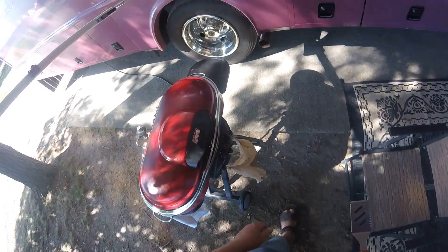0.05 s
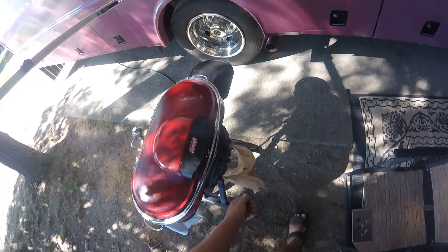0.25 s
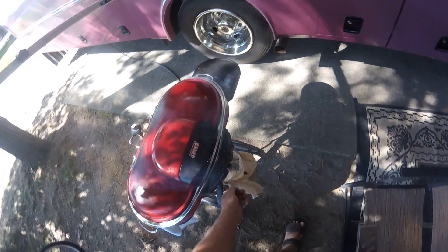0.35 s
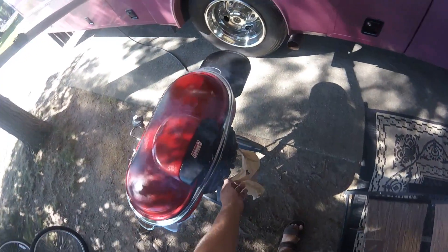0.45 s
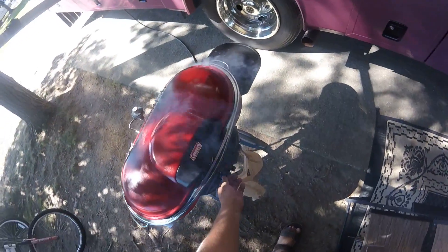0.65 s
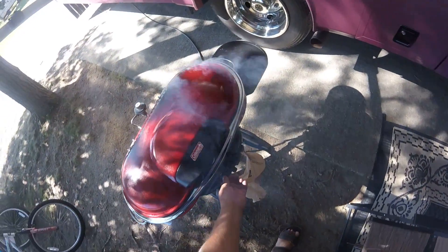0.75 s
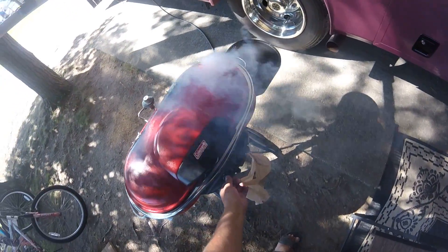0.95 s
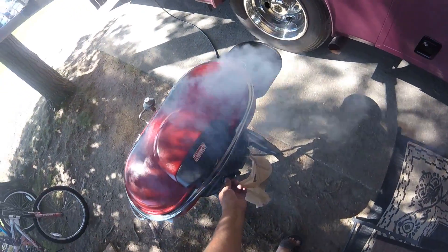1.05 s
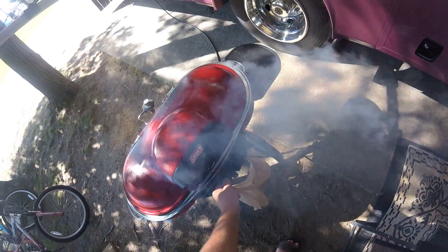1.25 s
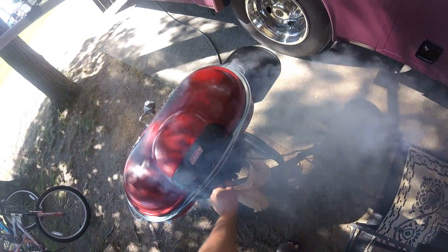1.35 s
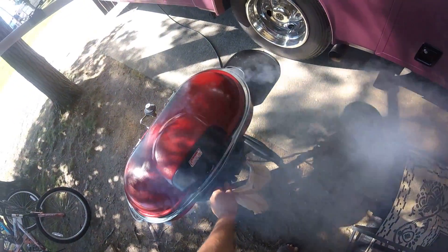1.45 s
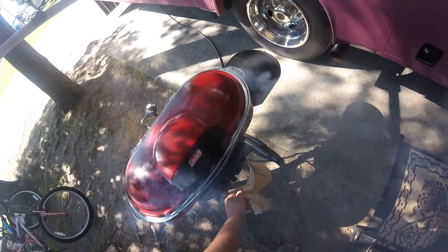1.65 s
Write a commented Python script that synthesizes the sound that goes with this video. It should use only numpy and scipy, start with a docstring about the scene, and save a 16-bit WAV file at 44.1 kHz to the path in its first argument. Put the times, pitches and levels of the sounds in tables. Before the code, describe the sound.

A gas grill clicks and lights with a low whump, then hisses steadily.

```python
"""A gas grill is lit outdoors, close up. Light wind rumbles on the microphone over a faint hum.
At 0.17 s the igniter clicks twice, a scrape with a steel ring. At 0.2 s the gas catches with a low
whump and the metal lid knocks and rattles on its rim. The burner then settles to a soft roar under
a steady hiss, spitting once at 0.9 s. Near 1.4 s the wind swells in a brief flutter."""
import sys
import numpy as np
from scipy.fft import rfft, irfft, next_fast_len
from scipy.io import wavfile
from scipy.ndimage import map_coordinates

SR = 44100
rng = np.random.default_rng(int(sys.argv[2]) if len(sys.argv) > 2 else 0)


def dump(signal):
    """Clip the signal to [-1, 1] and save it as 16-bit WAV at the path in sys.argv[1]."""
    limited = np.clip(np.atleast_2d(signal).T, -1, 1)
    pcm = np.round(limited * 32767).astype(np.int16)
    wavfile.write(sys.argv[1], SR, pcm)


N = 74970
TIME_S = np.arange(N) / SR


def amp(db):
    """Decibels to gain."""
    return 10 ** (np.asarray(db) / 20)


def curve(rows):
    """One value per sample from (time_s, value) rows."""
    return np.interp(TIME_S, *np.transpose(rows))


def since(start_s):
    """Seconds since start_s, zero before it."""
    return np.maximum(TIME_S - start_s, 0)


def strike(start_s, rise_s, t60_s):
    """Exponential rise and decay."""
    age_s = since(start_s)
    return (1 - np.exp(-age_s / rise_s)) * amp(-60 * age_s / t60_s)


def swell(centre_s, width_s):
    """Gaussian rise and fall."""
    return np.exp(-((TIME_S - centre_s) / width_s) ** 2)


def wobble(rate_hz):
    """Smooth curve through random knots."""
    knots = rng.standard_normal(int(N * rate_hz / SR) + 4)
    return map_coordinates(knots, [TIME_S * rate_hz])


def walk(start_s, rate_hz):
    """Random walk of 80 steps from zero."""
    path = np.append(0, np.cumsum(rng.standard_normal(80)))
    return np.interp(since(start_s) * rate_hz, np.arange(len(path)), path)


def filtered(x, response):
    """Apply a gain given as a function of frequency."""
    size = next_fast_len(N + SR // 2)
    return irfft(rfft(x, size) * response(np.fft.rfftfreq(size, 1 / SR)), size)[:N]


def noise(spectrum, tilt_db_per_oct=0):
    """Noise of rms 1, shaped by (freq_hz, gain_db) rows and a tilt."""
    freq_hz, gain_db = np.transpose(spectrum)

    def response(hz):
        shape_db = np.interp(np.log(hz + 1), np.log(freq_hz + 1), gain_db)
        return amp(shape_db + tilt_db_per_oct * np.log2(hz + 1))

    white = rng.standard_normal(next_fast_len(N + SR // 2))
    coloured = filtered(white, response)
    return coloured / np.sqrt(np.mean(coloured ** 2) + 1e-20)


def ring(modes, start_s, rise_s, scatter_db, rough_rad, steps_per_cycle, tilt_db_per_oct=0):
    """Struck modes with wandering phase; the tilt pivots on the third mode."""
    out = 0
    for pitch_hz, level_db, t60_s in modes:
        tilt_db = tilt_db_per_oct * np.log2(pitch_hz / modes[2][0])
        gain = amp(level_db + scatter_db * rng.standard_normal() + tilt_db)
        phase = 2 * np.pi * (pitch_hz * since(start_s) + rng.random())
        phase += rough_rad * walk(start_s, steps_per_cycle * pitch_hz)
        out += gain * strike(start_s, rise_s, t60_s) * np.sin(phase)
    return out


# pitch_hz, rms_db
HUM_TONES = [(120, -55), (165, -53.5)]

def hum():
    """Two faint tones, wavering in level and phase."""
    out = 0
    for pitch_hz, rms_db in HUM_TONES:
        envelope = np.sqrt(2) * amp(rms_db + 2.5 * wobble(rate_hz=4.94))
        out += envelope * np.sin(2 * np.pi * pitch_hz * TIME_S + 0.5 * wobble(rate_hz=5.98))
    return out


# time_s, level_db
WIND_ENVELOPE = [(0, -48.5), (.05, -46), (.15, -35), (.45, -32.5), (.68, -32.5), (.78, -38.5), (.92, -31.5),
                 (1.05, -34), (1.2, -34), (1.37, -32.5), (1.5, -37), (1.57, -32), (1.7, -35)]
# freq_hz, gain_db
WIND_SPECTRUM = [(8, -14), (18, 3), (29, -5.5), (45, -7.5), (65, -14), (130, -21), (200, -29.5), (500, -62),
                 (2000, -120)]
GUST_SPECTRUM = [(40, -6), (75, 8), (130, -8), (200, -19), (400, -37), (1500, -120)]

def wind():
    """Wind rumbles on the microphone, with one fluttering gust."""
    rumble = noise(WIND_SPECTRUM) * amp(curve(WIND_ENVELOPE) + 0.6 * wobble(rate_hz=11.7))
    gust = noise(GUST_SPECTRUM) * amp(-36) * swell(centre_s=1.39, width_s=0.07)
    return rumble + gust


# time_s, level_db
ROAR_ENVELOPE = [(0, -50.5), (.15, -47.5), (.3, -39.5), (.66, -44.5), (.95, -43.5), (1.4, -44),
                 (1.7, -45.5)]
# freq_hz, gain_db
ROAR_SPECTRUM = [(40, -34), (90, -14.5), (170, 3.5), (205, -6.5), (245, 3.5), (310, 3.5), (380, -4.5),
                 (450, 0), (580, -2.5), (700, 1), (830, 1.5), (950, -7), (1250, -11), (1550, -22),
                 (2500, -47), (8000, -120)]

def flame_roar():
    """The flame flutters with a soft roar."""
    return noise(ROAR_SPECTRUM) * amp(curve(ROAR_ENVELOPE) + 0.7 * wobble(rate_hz=25.84))


# time_s, level_db
FLOW_ENVELOPE = [(0, -55.5), (.12, -53), (.25, -49.8), (.36, -48.5), (.42, -47.5), (.62, -47.4), (.78, -47),
                 (.9, -47.5), (1.02, -48), (1.25, -47.8), (1.5, -48), (1.7, -47.5)]
# freq_hz, gain_db
HISS_SPECTRUM = [(900, -28), (1600, -13), (2000, -10), (2400, -9), (2950, -4.5), (3500, -5.5),
                 (4000, -10.5), (4600, -3), (5400, 1), (5850, -2), (6550, 0), (7100, -4), (7700, -8),
                 (8800, -9.5), (9700, -8), (11000, -13), (12500, -14), (13500, -20.5), (15000, -34)]
FIZZ_SPECTRUM = [(3000, -120), (6000, -25), (8500, -3), (10000, 0), (12500, -3), (15000, -7)]
SPIT_SPECTRUM = [(2000, -30), (3200, -1.5), (5000, -14), (7800, -5), (8600, -1), (9400, -12), (11500, -11),
                 (15000, -16)]

def burner_hiss():
    """The burner hisses, brighter as the flow grows, and spits once."""
    flow_db = curve(FLOW_ENVELOPE)
    hiss = noise(HISS_SPECTRUM) * amp(flow_db + 0.44)
    hiss *= amp(0.45 * wobble(rate_hz=30) + 0.32 * wobble(rate_hz=400))
    fizz_db = -64 + 2 * (flow_db - flow_db.max())  # airy top: 2 dB per dB of hiss
    fizz = noise(FIZZ_SPECTRUM) * amp(fizz_db + 2.2 * wobble(rate_hz=12))
    spit = noise(SPIT_SPECTRUM) * amp(-47.5) * swell(centre_s=0.888, width_s=0.014)
    return hiss + fizz + spit


# start_s, level_db, t60_s, tilt_db_per_oct
IGNITER_CONTACTS = [(0.1736, -34.5, 0.09, -1), (0.1985, -31, 0.014, -4), (0.2006, -31.5, 0.025, -1),
                    (0.2043, -36, 0.13, -2.5), (0.2106, -36.5, 0.045, 0)]
# freq_hz, gain_db
SCRAPE_SPECTRUM = [(900, 2.5), (1800, -4), (2400, 7.5), (3400, -2.5), (4100, -7.5), (5100, 7), (6800, -0.5),
                   (7800, -4), (9000, -2), (10200, -2.5), (12000, -14), (15500, -17)]
# pitch_hz, level_db, t60_s
STEEL_MODES = [(2335, -15, 0.15), (2700, -10.5, 0.1), (5070, -6, 0.017), (3550, -9, 0.079),
               (5400, -22, 0.035), (6650, -8.5, 0.13), (10120, -5, 0.021)]
HAMMER_MODES = [(5100, 0, .0075), (6600, -11, .006), (10300, -4, .005), (11500, -9, .005)]

def igniter():
    """Contacts scrape and ring the steel: one click, then a tight cluster as the hammer snaps."""
    clicks = 0
    for start_s, level_db, t60_s, tilt_db_per_oct in IGNITER_CONTACTS:
        scrape = noise(SCRAPE_SPECTRUM, tilt_db_per_oct) * strike(start_s, rise_s=0.0006, t60_s=t60_s)
        steel = ring(STEEL_MODES, start_s, rise_s=0.00028,
                     scatter_db=1, rough_rad=0.74, steps_per_cycle=0.22)
        clicks += amp(level_db) * (scrape + amp(-4.5) * steel)
    snap = ring(HAMMER_MODES, start_s=0.2007, rise_s=0.0008,
                scatter_db=0, rough_rad=0.3, steps_per_cycle=0.31)
    return clicks + amp(-19.5) * snap


# start_s, level_db, tilt_db_per_oct
LID_KNOCKS = [(.177, -34.5, 5), (0.2016, -23.5, 0), (0.2097, -26.5, 3), (0.2182, -19, -2),
              (0.2366, -28, 0.5), (0.255, -36, 5.5), (0.2844, -29, 4.5), (0.2946, -28.5, 2),
              (0.3221, -30.5, -3.5), (0.361, -37.5, -.5), (.391, -31.5, 2), (.473, -36, -4.5),
              (0.528, -37.5, -3)]
# pitch_hz, level_db, t60_s
LID_MODES = [(126, 2, .15), (231, -9.5, .1), (296, -6, .16), (340, -12, .1), (428, -14, .1),
             (622, -14, .11), (715, -13.5, .08), (788, -11.5, .09), (868, -14, .11), (1050, -21, .08),
             (1220, -26, .08)]
# freq_hz, gain_db
THUD_SPECTRUM = [(40, -16), (100, 8), (150, 3), (205, -5), (310, -1), (480, -20.5), (760, -9), (1000, -19),
                 (1400, -29.5), (2000, -37), (6000, -120)]

def lid():
    """The lid jumps and rattles on its rim: each contact is a hollow ring and a dull thud."""
    out = 0
    for start_s, level_db, tilt_db_per_oct in LID_KNOCKS:
        hollow = ring(LID_MODES, start_s, rise_s=0.001, scatter_db=2.5,
                      rough_rad=0.85, steps_per_cycle=0.231, tilt_db_per_oct=tilt_db_per_oct)
        thud = noise(THUD_SPECTRUM, tilt_db_per_oct) * strike(start_s, rise_s=0.001, t60_s=0.047)
        out += amp(level_db) * (hollow + amp(-2.5) * thud)
    return out


# freq_hz, gain_db
FLARE_SPECTRUM = [(40, -5), (90, 8.5), (150, 4.5), (200, -1), (310, -7.5), (390, -7.5), (600, -15),
                  (850, -13.5), (1000, -22.5), (1350, -17), (1700, -44), (2300, -23.5), (4000, -48),
                  (8000, -120)]
# centre_s, level_db, half_width_s
LOW_PUFFS = [(0.366, -19.5, 0.0021), (0.4753, -19, 0.0018)]

def ignition():
    """The gas catches: the air under the lid throbs, a flare dies away and two puffs follow."""
    start_s, rise_s, throb_hz = 0.2027, 0.0049, 29.8
    throb = -np.sin(2 * np.pi * throb_hz * since(start_s)) * strike(start_s, rise_s, t60_s=0.6)
    flare = noise(FLARE_SPECTRUM) * strike(start_s, rise_s, t60_s=0.57)
    out = amp(-13.5) * throb + amp(-25) * flare
    for centre_s, level_db, half_width_s in LOW_PUFFS:
        offset = (TIME_S - centre_s) / half_width_s
        pulse = -offset * np.exp((1 - offset ** 2) / 2)  # one push and pull, peak 1
        tail = noise(FLARE_SPECTRUM) * strike(centre_s - half_width_s, half_width_s, t60_s=0.22)
        out += amp(level_db) * (pulse + amp(-15) * tail)
    return out


def scene():
    """Grill and surroundings in one channel."""
    grill = igniter() + lid() + ignition() + burner_hiss() + flame_roar()
    return (grill + wind() + hum())[None]


def record(dry):
    """Brick-wall low-pass."""
    cutoff_hz = 15100
    return filtered(dry[0], lambda hz: hz < cutoff_hz)[None]


dry = scene()
out = record(dry)
dump(out)
```